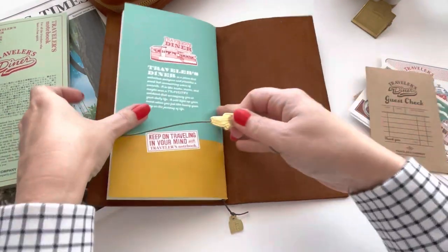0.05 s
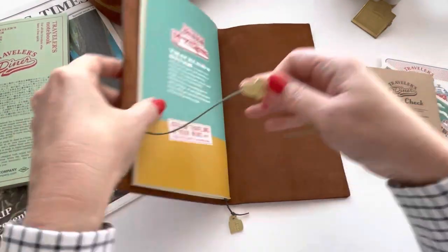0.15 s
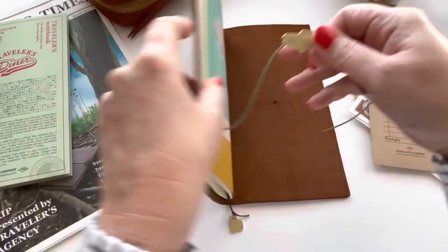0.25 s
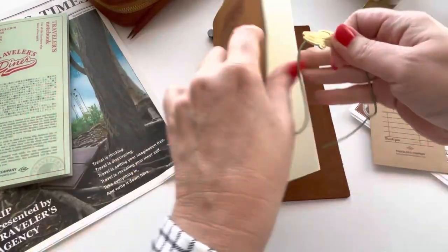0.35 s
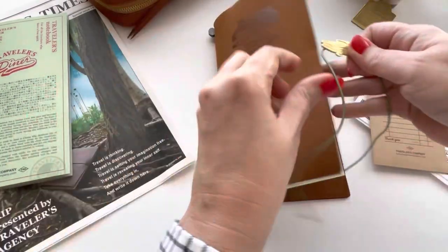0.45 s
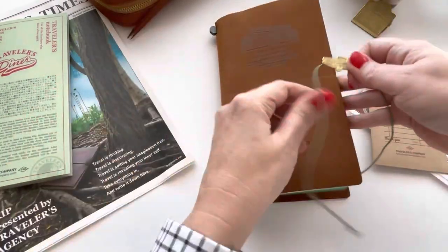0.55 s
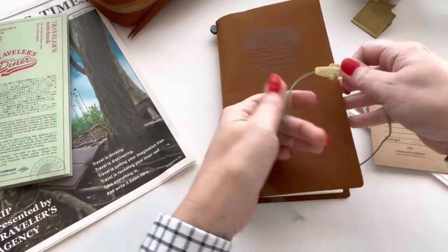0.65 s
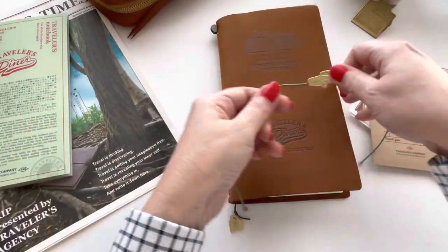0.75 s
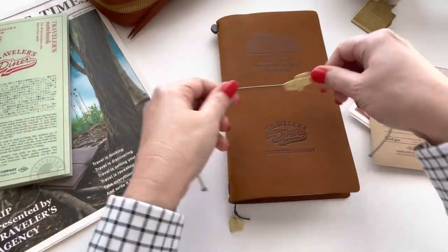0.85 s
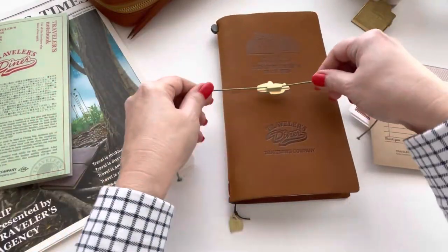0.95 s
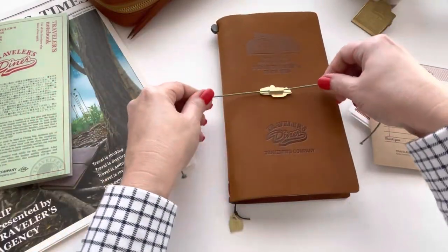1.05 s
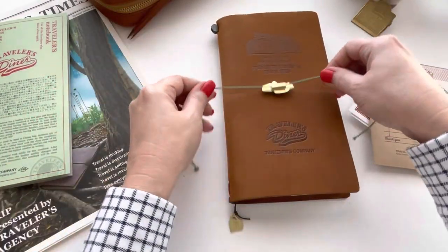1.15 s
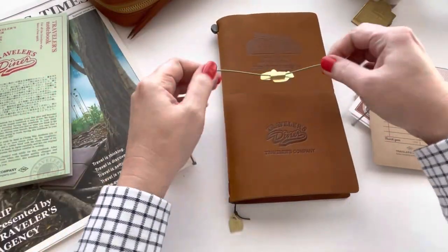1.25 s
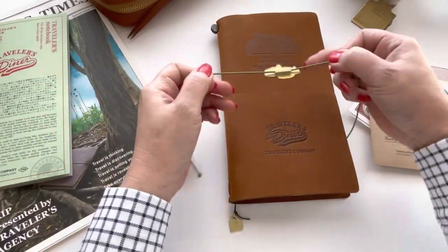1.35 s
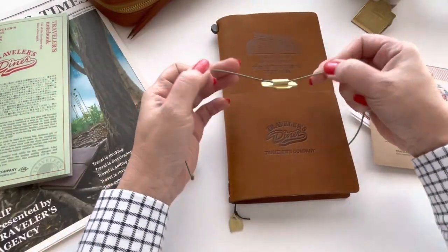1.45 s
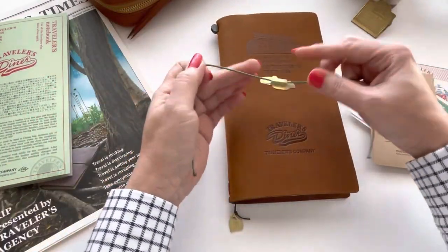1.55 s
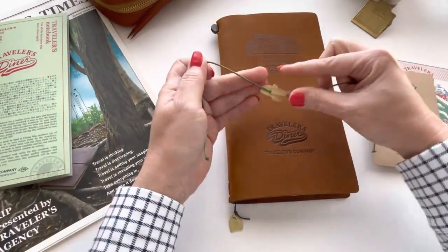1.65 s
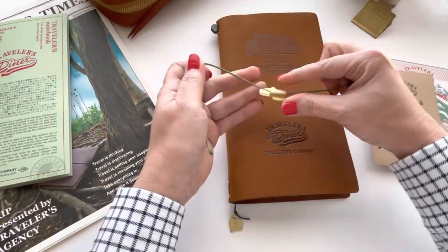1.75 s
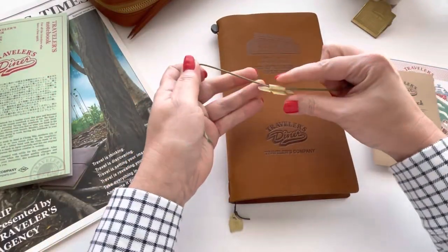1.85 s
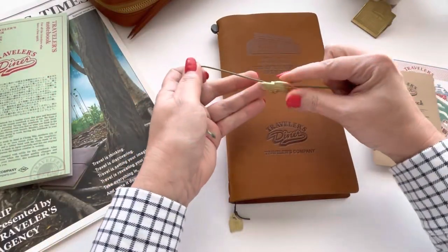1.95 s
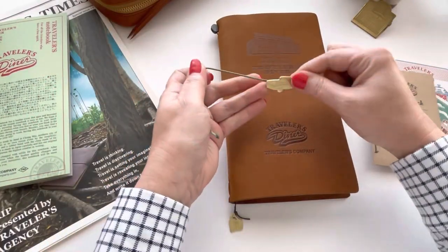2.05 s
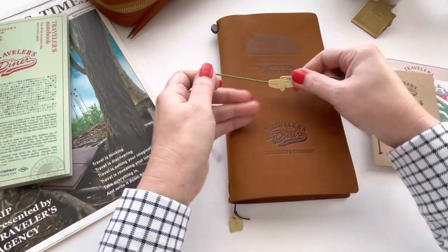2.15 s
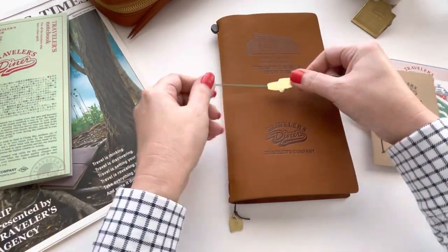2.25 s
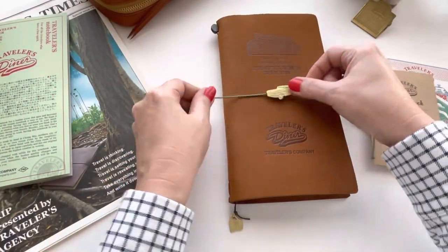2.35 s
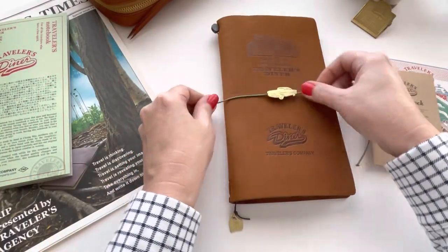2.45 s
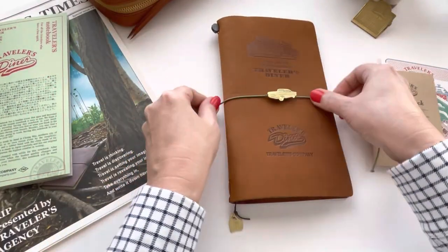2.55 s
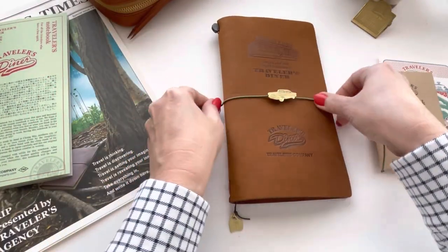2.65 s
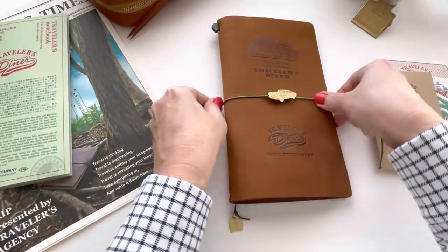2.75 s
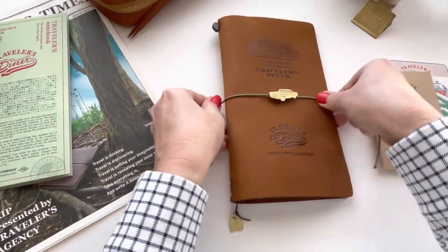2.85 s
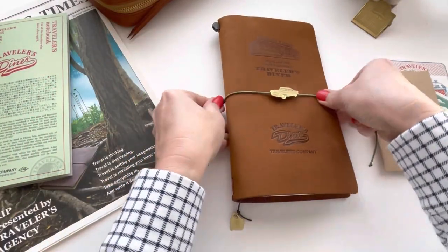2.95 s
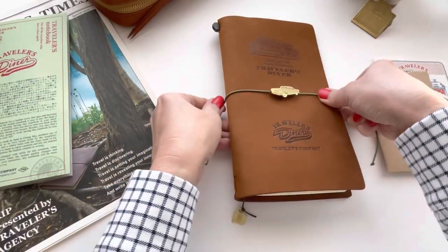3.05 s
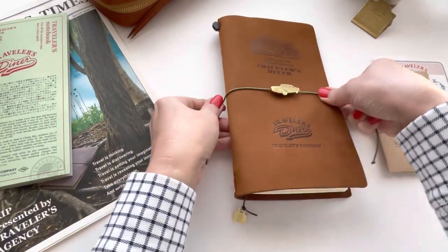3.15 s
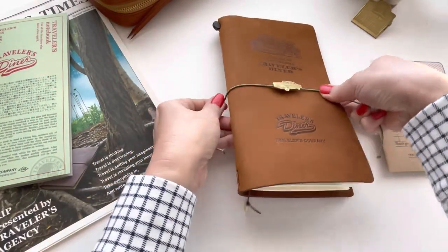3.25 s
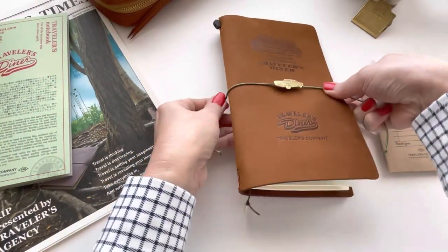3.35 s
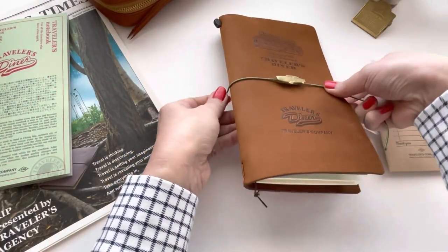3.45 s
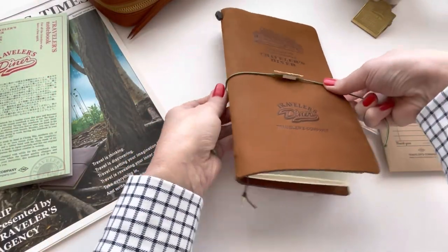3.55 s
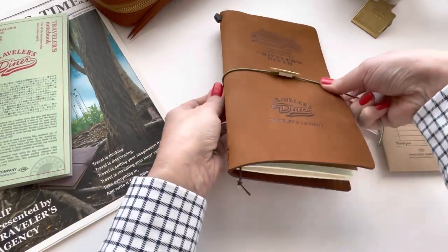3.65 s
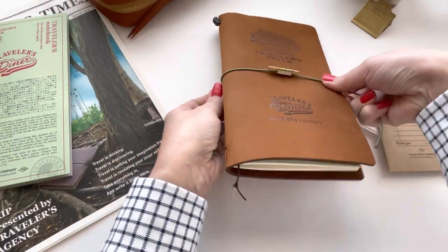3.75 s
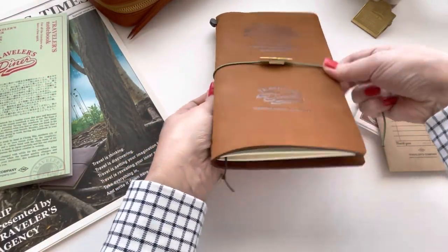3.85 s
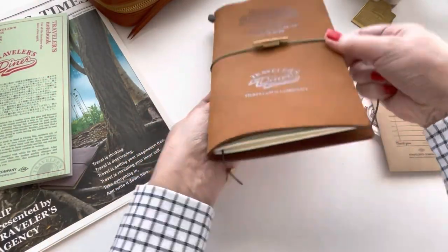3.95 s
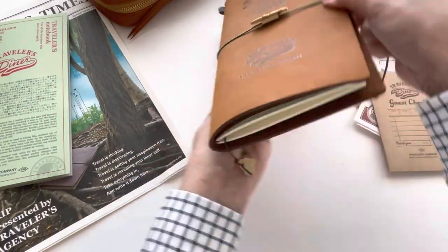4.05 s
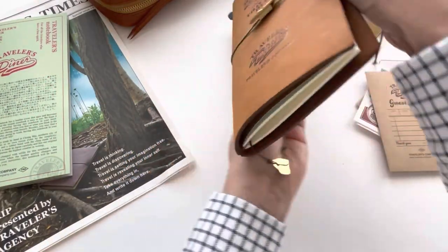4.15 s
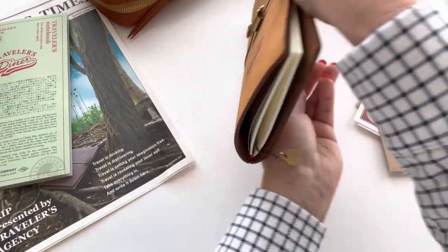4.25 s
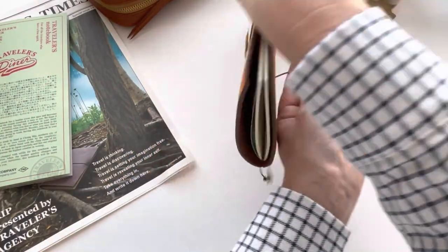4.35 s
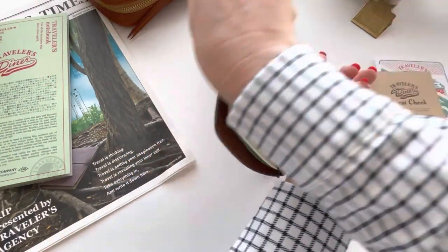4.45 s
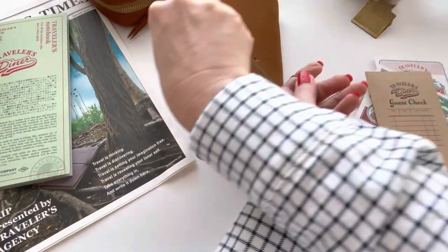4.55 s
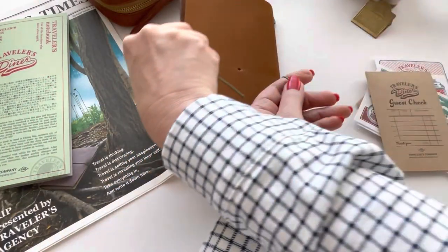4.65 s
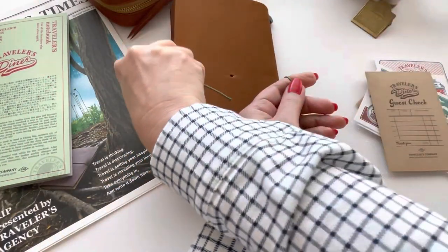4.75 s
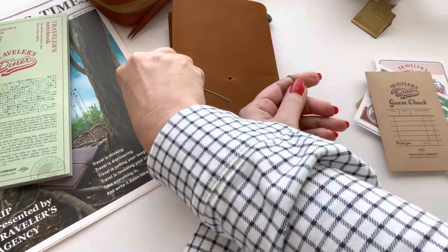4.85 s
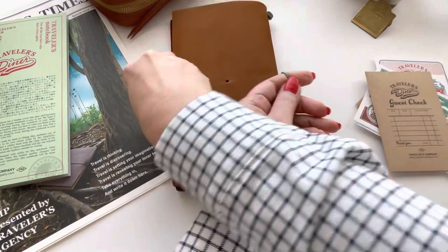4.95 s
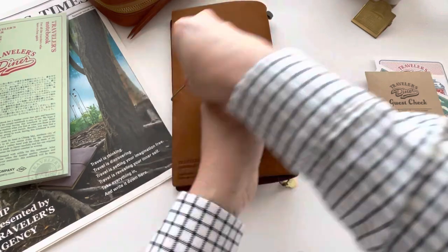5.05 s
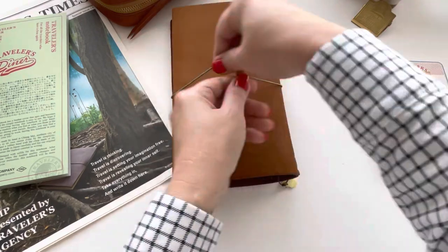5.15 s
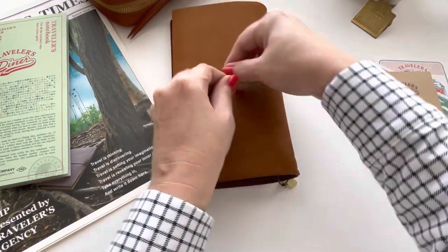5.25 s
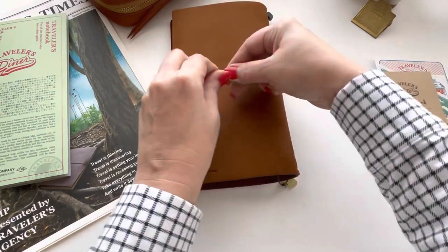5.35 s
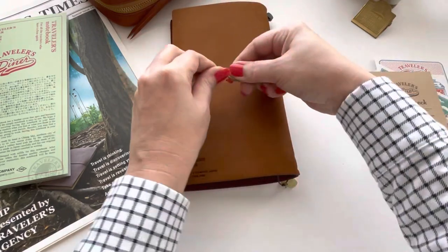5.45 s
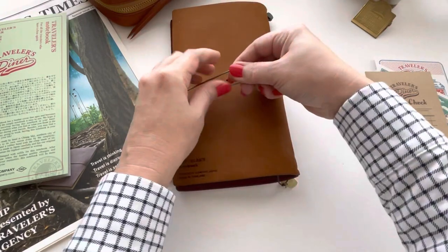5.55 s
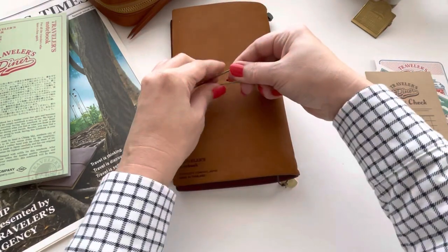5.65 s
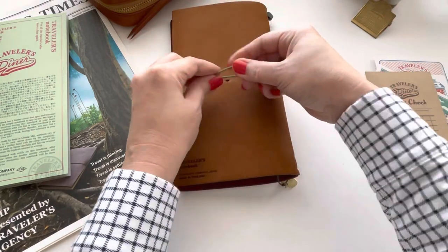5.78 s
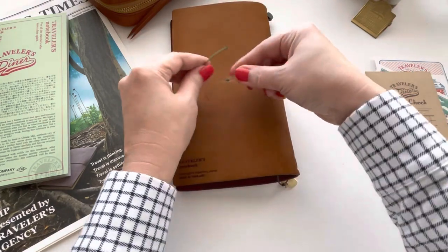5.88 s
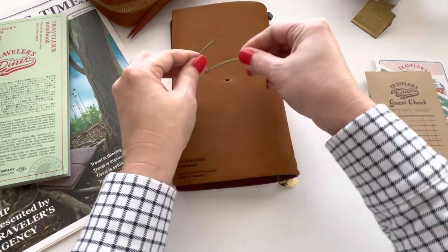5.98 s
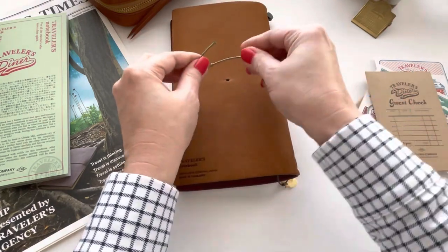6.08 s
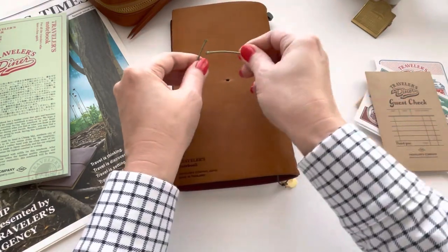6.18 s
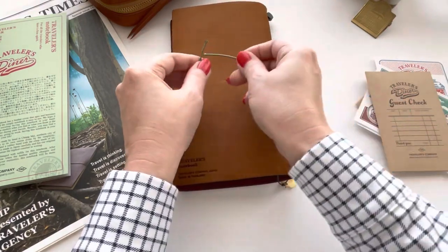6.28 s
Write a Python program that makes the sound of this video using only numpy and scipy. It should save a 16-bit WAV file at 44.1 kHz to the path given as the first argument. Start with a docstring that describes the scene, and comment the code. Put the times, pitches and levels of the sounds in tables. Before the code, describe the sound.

Hands work at a table with a leather-covered notebook and small metal charm. Opening skin hiss and cover flap end in knocks and a dull thud; two quick taps follow, then only tiny cord rustles. Gentle clicks and dry scrapes build to the loudest moment, a rapid burst of woody knocks and leather rub as the book lands. It fades to faint fidgeting in a small, quiet room, heard close in stereo, slightly stronger on the right.

```python
"""At a hollow table in a quiet room, hands close, lift, turn over and set down a leather notebook.
Nails, a metal charm and the cover tap: falling chirps with rattling, snapping and ticking noise bursts.
Soft pushes boom as decaying modes of the table top; skin, cord and cloth rub as shaped noise in short strokes.
A stereo microphone hears these near sources partly alike; the room answers with a decaying tail and hums."""
import sys
import numpy as np
from scipy import signal
from scipy.fft import rfft, irfft, next_fast_len
from scipy.io import wavfile
from scipy.ndimage import uniform_filter1d, map_coordinates

SR = 44100
rng = np.random.default_rng(int(sys.argv[2]) if len(sys.argv) > 2 else 0)


def field_ratio(decibels):
    """Amplitude ratio for a level in dB (20 dB per decade); scalars and array-likes work."""
    return 10 ** (np.asarray(decibels, dtype=float) / 20)


def wav_record(signal):
    """Record a signal, one row per channel, as 16-bit PCM in the file named by sys.argv[1]."""
    frames = np.transpose(np.atleast_2d(signal))
    bounded = np.clip(frames, -1, 1)
    # unit amplitude maps onto the largest positive 16-bit level
    quanta = np.round(bounded * 32767).astype(np.int16)
    wavfile.write(sys.argv[1], SR, quanta)


N = 278712  # length in samples

# Sharp contacts. Each row: start in seconds, level in dB, reference pitch of the chirp in Hz,
# snap in relative dB, tick in relative dB.
TAPS = [(0.351, -38.5, 970, 2, -4), (0.36, -20, 1970, -18, -8), (0.365, -22, 903, -6, -16),
        (0.384, -46, 665, -1, -19), (0.467, -44, 704, 0, -19), (0.516, -46, 910, -9, -25),
        (0.568, -31.5, 1900, -5, -22), (0.586, -25, 2320, -22, -16), (0.621, -22.5, 1322, -9.5, -20),
        (0.913, -22, 1030, -10.5, -52), (0.924, -24, 1230, -15.5, -19.5), (1.019, -26, 1430, -22, -39),
        (1.026, -34, 700, -29, -43), (1.092, -59.5, 1090, -20, 5.5), (1.3, -49.5, 1880, -11, -30),
        (2.263, -61, 1000, 1, 13), (2.33, -35.5, 1110, -35, -30), (2.479, -51, 614, -13, -17),
        (2.609, -38.5, 1286, -6, -21), (2.658, -44, 1650, -22, -29), (2.909, -33, 1330, -30, -31),
        (2.919, -27, 1756, -10, -23), (2.927, -31, 870, -36, -41), (2.976, -29, 980, -36, -24),
        (3.039, -36, 870, -38, -30), (3.268, -49.5, 890, -5, -13), (3.311, -43.5, 1520, -32, -31),
        (3.396, -45, 1040, -32, 6), (3.527, -34, 1235, -19.5, -38), (3.575, -38.5, 640, -25, -35),
        (3.607, -30.5, 640, -35, -31), (3.75, -44.5, 1990, -18, -30), (3.794, -43, 2280, -27, -21),
        (3.808, -46, 1480, -16, -26), (4.411, -12.5, 1365, -39.5, -30), (4.415, -13, 1230, -42, -23.5),
        (4.421, -14, 825, -33, -55), (4.444, -25.5, 850, -26.5, -23.5), (4.46, -12, 1215, -33.5, -24.5),
        (4.466, -11, 767, -38.5, -42), (4.482, -18.5, 606, -26, -31), (4.487, -9, 796, -6.5, -39.5),
        (4.495, -11, 790, -24.5, -36.5), (4.504, -20.5, 1100, -23, -38.5), (4.512, -25, 760, -22.5, -39.5),
        (4.545, -20.5, 1480, -14, -46.5), (4.552, -38.5, 883, -11, -37), (4.627, -22.5, 1412, -31, -42.5),
        (4.781, -45.5, 1260, -30, -38), (4.914, -31.5, 764, -1.5, -2.5), (4.927, -26.5, 1560, -9.5, -10),
        (4.941, -21.5, 820, -28.5, -33), (4.989, -39.5, 910, -8, -33), (5.266, -44, 736, -28, -29),
        (5.299, -55, 1800, -13, -8), (5.884, -49.5, 2160, -16, -30), (6.148, -51, 786, -20, -27)]
TAP_T60_S = 0.016  # decay of every chirp
# Hard edge of a contact. Each row: frequency in Hz, spectral level in dB.
SNAP_SPECTRUM = [(1500, 14), (2800, 6.5), (4500, 2), (6500, -12), (9000, -22)]
# Cover and page block resonances. Each row: frequency in Hz, width in Hz, level in dB.
BOOK_MODES = [(870, 24, 1.5), (1330, 37, -5), (1702, 12, -11.5), (2020, 25, -8), (2320, 78, -0.5),
              (2780, 20, -29), (3160, 420, 0)]
# Soft heavy contacts on the table. Each row: start in seconds, level in relative dB,
# contact time constant in seconds, brightness in dB per octave, extra level of the deepest mode in dB.
THUDS = [(0.361, -36.5, 0.0015, 0.5, 6.5), (0.398, -46.5, 0.0024, 2, -4), (0.466, -40.5, 0.012, 0.1, 4),
         (0.6, -16, 0.0056, -2.7, -2.5), (0.623, -36, 0.003, -4, 4), (0.916, -33.5, 0.0056, -4, -5),
         (1.02, -38, 0.0087, 0, -6), (2.333, -42, 0.0054, 1, -2), (2.611, -34.5, 0.0026, -7.5, -8.5),
         (2.719, -39, 0.0042, -5, -14), (2.828, -42, 0.0029, -4, 2), (2.923, -39, 0.003, 6.5, 1),
         (2.979, -27.5, 0.0017, -3.5, -11), (3.397, -43, 0.0028, 4, 6), (3.576, -25.5, 0.0023, 8, 5),
         (3.609, -38, 0.0023, 3, -8), (3.787, -56, 0.0046, 9.5, -9), (4.414, -31.5, 0.0035, 20.5, 9),
         (4.46, -26, 0.0031, 17.5, 1), (4.489, -29.5, 0.0027, -2, -4), (4.542, -23.5, 0.0053, 8.5, 6),
         (4.68, -38.5, 0.0023, -1.5, 0), (4.944, -24.5, 0.0032, -4, -4)]
# Table top modes. Each row: frequency in Hz, level in dB, T60 in seconds.
TABLE_MODES = [(90.3, -9.5, 0.29), (188.3, 1, 0.11), (240.5, -6.5, 0.14), (342.3, -4.5, 0.086),
               (411, -6.5, .1), (512, -10.5, 0.061), (674, -13.5, 0.034)]
# Skin and cloth sliding over a smooth surface. Each row: peak time in seconds, rise in seconds,
# fall in seconds, hiss level in dB, finest hiss level in dB.
SLIDES = [(0.0, .01, 0.13, -48, -56), (0.105, .3, 0.094, -61.5, -60), (0.323, 0.026, 0.022, -47, -51),
          (0.378, 0.0085, 0.056, -55, -63), (0.478, 0.031, .04, -62.5, -70), (0.57, 0.014, 0.049, -45, -54),
          (0.79, 0.038, .037, -67, -75.5), (0.908, 0.012, .02, -63, -61), (1.172, .018, .04, -56.5, -61),
          (1.504, .04, 0.028, -71.5, -64), (1.636, .025, .025, -85, -72), (2.579, .007, 0.069, -56, -58),
          (2.789, 0.038, 0.041, -62, -71), (2.919, .015, .018, -80, -71), (3.035, 0.088, 0.058, -68, -59.5),
          (3.23, 0.067, 0.02, -67, -53), (3.392, .011, 0.019, -50, -65), (3.804, .1, 0.1, -71, -84),
          (3.992, 0.13, 0.17, -68, -79), (4.148, 0.099, 0.082, -65, -69), (4.215, .05, 0.17, -64.5, -73.5),
          (4.385, 0.068, 0.056, -51.5, -53.5), (4.44, .03, .03, -80, -80),
          (4.459, 0.0026, 0.016, -60, -32.5), (4.497, 0.035, 0.062, -58, -71),
          (4.926, 0.016, 0.025, -45.5, -57), (5.122, 0.13, 0.063, -62, -58), (5.296, .05, 0.039, -76, -79),
          (5.761, 0.031, .022, -74, -61)]
# Skin on a smooth surface. Each row: frequency in Hz, spectral level in dB.
HISS_SPECTRUM = [(2200, -12), (3500, -3), (5000, -1.5), (8000, -2.5), (11000, -4.5), (12600, -11.5),
                 (14000, -40)]
# Dry cloth and fingertip ridges. Each row: frequency in Hz, spectral level in dB.
FINE_SPECTRUM = [(11500, -22), (13200, -11.5), (15000, 7.5), (15800, -12.5), (16600, -28.5)]
# Scrapes of leather and paper. Each row: peak time in seconds, rise in seconds, fall in seconds,
# level in dB, pitch in Hz of the cavity under the hand.
SCRAPES = [(0.0, .01, 0.054, -38.5, 3330), (0.005, 0.023, .05, -46, 1460), (0.1, 0.18, 0.2, -64.5, 3100),
           (0.22, 0.14, .15, -68.5, 1400), (0.323, 0.024, 0.053, -52.5, 2900),
           (0.392, 0.04, 0.042, -48, 2146), (0.473, 0.014, 0.077, -54.5, 1600),
           (0.568, 0.023, .04, -43, 2030), (0.588, .03, 0.039, -44, 2200),
           (0.612, 0.091, 0.07, -48.5, 1520), (0.69, .15, 0.069, -70, 1450),
           (0.934, 0.011, 0.041, -48, 2100), (2.614, .035, 0.089, -54, 1330),
           (2.79, 0.06, 0.073, -52, 2100), (2.919, 0.019, 0.026, -40.5, 1330), (3.024, 0.13, 0.1, -53, 887),
           (3.165, 0.018, 0.052, -60, 1190), (3.229, 0.042, 0.028, -47, 920), (3.27, 0.011, .01, -50, 1070),
           (3.403, 0.0085, 0.016, -55, 1280), (3.536, 0.0046, 0.044, -58, 1000),
           (3.56, .03, 0.046, -59, 1690), (3.613, 0.048, 0.054, -60.5, 1320),
           (3.74, 0.011, 0.13, -63, 1320), (3.804, 0.036, 0.014, -53.5, 1670),
           (3.88, 0.053, 0.032, -68.5, 1800), (3.992, 0.04, 0.06, -66, 2030),
           (4.148, 0.09, 0.092, -71.5, 2020), (4.215, 0.086, 0.27, -66, 2530),
           (4.341, .018, 0.16, -50.5, 2390), (4.365, 0.038, 0.079, -58, 1420),
           (4.388, 0.054, 0.018, -43, 2280), (4.445, 0.032, 0.02, -45, 1130),
           (4.514, 0.055, 0.04, -31.5, 978), (4.545, .04, 0.06, -39.5, 1240), (4.605, .1, 0.12, -53, 1220),
           (4.646, 0.016, 0.095, -49.5, 1300), (4.677, 0.029, 0.022, -47.5, 820),
           (4.72, 0.023, .025, -51.5, 796), (4.783, 0.063, 0.07, -57.5, 1450),
           (4.88, 0.021, 0.064, -58.5, 1350), (4.916, 0.011, 0.06, -41.5, 1180),
           (4.94, 0.034, 0.019, -47.5, 1110), (5.07, 0.17, 0.27, -62.5, 1230),
           (5.128, 0.082, 0.061, -57, 1420), (5.296, 0.083, 0.058, -61, 1135),
           (5.812, 0.013, 0.045, -63.5, 1400)]
# Scrape sound outside the cavity resonance. Each row: frequency in Hz, spectral level in dB.
SCRAPE_SPECTRUM = [(290, -6), (500, 2.5), (690, -11), (914, -5), (1220, -23), (1340, -3.5), (2310, -6.5),
                   (4300, -22.5), (6000, -34), (7800, -60.5), (13200, -120)]
SLIDE_ROUND, SCRAPE_ROUND = 1.26, 1.24  # exponents of the swells: 1 is a pointed peak, more is rounder
FINE_SHORTER = 0.67  # the finest hiss rises and falls in this share of the slide's times
# A firm scrape rings narrow; loose paper and lighter scrapes add width (shares of the pitch).
FIRM_DB, FIRM_WIDTH, PAPER_WIDTH, LIGHT_WIDTH = -42, 0.3, 0.92, 0.31
# Faint fidgeting of fingers and cord between strokes. Each row: time in seconds, nominal level in dB.
FIDGET = [(0, -71), (0.75, -72.5), (0.85, -95), (1.25, -86), (1.42, -72), (1.7, -76.5), (1.8, -105),
          (2.52, -80), (2.7, -63), (3.2, -76), (3.33, -81), (3.6, -70), (4.75, -77.5), (5.42, -69.5),
          (5.5, -95.5), (5.78, -92), (5.92, -73), (6.32, -70)]
FIDGET_HZ, FIDGET_SWING_DB = 1850, 3.5  # cavity pitch; unevenness of the nominal level
FIDGET_HISS_DB, FIDGET_FINE_DB = -19 + 7, -19  # both hisses, relative to the fidgeting scrape
# Microphone bass roll-off for taps and thuds. Each row: frequency in Hz, gain in dB.
MIC = [(20, -42), (45, -14), (80, -6), (150, -1.1), (16000, -3)]
# Stereo balance of near sources. Each row: frequency in Hz, left minus right in dB.
TILT = [(60, -0.5), (180, -4), (550, -3), (1650, -5.5), (4970, -6.5), (15000, -3.5)]
# Likeness of near sources at left and right. Each row: frequency in Hz, correlation (no unit).
NEAR_LIKENESS = [(100, 1), (500, 0.93), (1500, 0.45), (4000, 0.3), (9000, 0.26), (14000, 0.7)]
# Phase lag of the left port in the part heard alike. Each row: frequency in Hz, lag in radians.
LAG = [(100, .01), (900, 0.54), (2300, 1.48), (5000, 1.04), (10000, 1.1), (14000, .3)]
# Decay of the room's answer. Each row: frequency in Hz, T60 in seconds.
ROOM_DECAY = [(150, 0.26), (1000, 0.18), (4000, .22), (12000, 0.2)]
# Room tone. Each row: frequency in Hz, relative spectral level in dB.
HUM_SPECTRUM = [(15, -66.5), (25, -39.5), (43, -20), (66, -11.5), (120, -2), (200, -6.5), (242, -6.5),
                (405, -11), (476, -12), (607, -15.5), (962, -21.5), (1230, -23.5), (1370, -25.5),
                (10700, -36), (16000, -37)]
HUM_DB = -62.5  # level about which the hum breathes
# Likeness of the hum at left and right. Each row: frequency in Hz, correlation (no unit).
HUM_LIKENESS = [(60, 0.88), (240, 0.66), (950, -0.069), (3770, -0.24), (15000, 0.2)]


def taps():
    """Dispersion: treble outruns bass in a stiff sheet, so a contact arrives as a falling chirp with noise."""
    out, t = np.zeros(N + SR), np.arange(SR // 6) / SR
    rise = 1 - np.exp(-(t / 0.00089) ** 2)
    fade = field_ratio(-60 * t / TAP_T60_S)
    fall_s = 0.00255  # time constant of the chirp's fall
    # integral of a frequency falling from 1.77 to 0.546 times the reference pitch
    cycles = 0.546 * t + 1.224 * fall_s * (1 - np.exp(-t / fall_s))
    for s, db, hz, snap_db, tick_db in TAPS:
        noise = rng.standard_normal((3, len(t)))
        chirp = np.sin(2 * np.pi * hz * cycles)
        rattle = unit(filtered(noise[0], lambda f: book(f) * peak(f, hz, width=2.4) / (1 + (f / 2250) ** 6)))
        snap = unit(filtered(noise[1], lambda f: field_ratio(along(SNAP_SPECTRUM, f))))
        snap = snap * field_ratio(-60 * t / 0.016)
        tick = unit(filtered(noise[2], lambda f: field_ratio(along(HISS_SPECTRUM, f)) + 0.6 * field_ratio(along(FINE_SPECTRUM, f))))
        tick = tick * field_ratio(-60 * t / 0.0095)
        body = chirp * fade + 0.3 * rattle * fade ** 0.45
        settle = 0.06 * rattle * field_ratio(-60 * t / 0.07)  # the pages settle after the knock
        sound = body + settle + field_ratio(snap_db + 7.5) * snap + field_ratio(tick_db + 7.0) * tick
        out[round(s * SR):][:len(t)] += field_ratio(db) * rise * sound
    return out[:N]


def thuds():
    """Modal excitation: a soft push rings the table's modes, the deepest depending on where it lands."""
    out, t = np.zeros(N + SR), np.arange(SR // 3) / SR
    hz, level_db, t60 = np.transpose(TABLE_MODES)[:, :, None]
    modes = field_ratio(-60 * t / t60) * np.sin(2 * np.pi * hz * t)
    for s, db, contact, bright_db, deep_db in THUDS:
        mode_db = level_db + bright_db * np.log2(hz / 200) + deep_db * (hz == hz[0])
        mode_db = mode_db + 2.4 * rng.standard_normal(hz.shape)
        ring = np.sum(field_ratio(mode_db) * modes, axis=0)
        onset = 1 - np.exp(-t / max(contact, 0.0003))
        out[round(s * SR):][:len(t)] += field_ratio(db - 4.5) * ring * onset
    return out[:N]


def strokes():
    """Sliding friction: skin hisses and leather scrapes, with one fidgeting power beneath both."""
    coarse = np.arange(N)[::32] / SR  # envelopes are computed every 32 samples
    fidget_db = np.interp(coarse, *np.transpose(FIDGET)) + FIDGET_SWING_DB * wobble(30)[::32]
    fidget = field_ratio(2.015 * fidget_db)
    return slides(coarse, fidget) + scrapes(coarse, fidget)


def slides(coarse, fidget):
    """Friction on a smooth surface: dense slips give a hiss, and finer ridges a shorter, finer one."""
    s, rise, fall, hiss_db, fine_db = np.transpose(SLIDES)[:, :, None]
    hiss = unit(filtered(slips(grain_db=-1.0, clump_db=0.5), lambda hz: field_ratio(along(HISS_SPECTRUM, hz))))
    fine = unit(filtered(slips(grain_db=0.5, clump_db=3.5), lambda hz: field_ratio(along(FINE_SPECTRUM, hz))))
    hiss_power = swells(coarse, s, rise, fall, hiss_db, SLIDE_ROUND)
    fine_power = swells(coarse, s, FINE_SHORTER * rise, FINE_SHORTER * fall, fine_db, SLIDE_ROUND)
    hiss = level(coarse, hiss_power, fidget, FIDGET_HISS_DB) * hiss
    return hiss + level(coarse, fine_power, fidget, FIDGET_FINE_DB) * fine


def scrapes(coarse, fidget):
    """Cavity resonance: friction noise is coloured by the book and by the hollow under the hand."""
    s, rise, fall, scrape_db, pitch = np.transpose(SCRAPES)[:, :, None]
    power = swells(coarse, s, rise, fall, scrape_db, SCRAPE_ROUND)
    hz, t, z = signal.stft(slips(grain_db=3.0, clump_db=1.5), SR, nperseg=256)
    frame = np.minimum((t * SR / 32).astype(int), len(coarse) - 1)
    centre = np.append(pitch, FIDGET_HZ)
    paper = np.clip((centre - 2450) / 500, 0, 1)  # the highest scrapes are loose paper, broad in colour
    light = np.clip((FIRM_DB - np.append(scrape_db, FIRM_DB - 20)) / 20, 0, 1)  # fidgeting is lightest
    spread = FIRM_WIDTH + PAPER_WIDTH * paper + LIGHT_WIDTH * light
    cavity = np.abs(peak(hz[:, None], centre, spread)) ** 2
    colour = cavity * book(hz)[:, None] + 0.41 * field_ratio(along(SCRAPE_SPECTRUM, hz))[:, None]
    colour_power = (colour / np.linalg.norm(colour, axis=0)) ** 2
    # overlapping strokes mix by power
    mixed = np.sqrt(colour_power @ np.vstack([power, fidget])[:, frame])
    mixed = mixed / np.linalg.norm(mixed, axis=0)
    scrape = unit(signal.istft(z * mixed, SR, nperseg=256)[1][:N])
    return level(coarse, power, fidget, 0) * scrape


def level(coarse, power, fidget, fidget_db):
    """Incoherent sources add in power: the amplitude of all strokes and fidgeting at each sample."""
    total = power.sum(axis=0) + fidget * field_ratio(2 * fidget_db)
    return np.interp(np.arange(N) / SR, coarse, np.sqrt(total))


def swells(time, s, rise, fall, db, roundness):
    """Power envelope of each stroke: rise and fall are the times to climb and drop 20 dB."""
    gap = time - s
    drop_db = 20 * np.where(gap < 0, -gap / rise, gap / fall) ** roundness
    return field_ratio(2 * (db - drop_db))


def slips(grain_db, clump_db):
    """Stick and slip: dense tiny slips of uneven size, coming in clumps."""
    size_db = grain_db * rng.standard_normal(N) + clump_db * wobble(130)
    return unit(patchy(rng.standard_normal(N) * field_ratio(size_db), patchy_db=3.0))


def patchy(x, patchy_db):
    """Varying surface: the rubbed spot keeps changing, so bands of colour come and go."""
    z = signal.stft(x, nperseg=256)[2]
    field = uniform_filter1d(rng.standard_normal(z.shape), size=5, axis=0)  # across frequency
    field = uniform_filter1d(field, size=9, axis=1)  # across time
    return signal.istft(z * field_ratio(patchy_db * unit(field)), nperseg=256)[1][:N]


def book(f):
    """Modal superposition: the notebook's resonances, alternating in sign, over a flat share."""
    total = 0
    for k, (hz, width, db) in enumerate(BOOK_MODES):
        total = total + (-1) ** k * field_ratio(db) * peak(f, hz, width / hz)
    return 0.5 + np.abs(total)


def peak(f, hz, width):
    """Damped resonance: the response of one mode at hz, its width a share of hz."""
    damping = 1j * f * hz * width
    return damping / (hz * hz - f * f + damping)


def ports(x):
    """Partial coherence: moving hands smear the unlike part anew every moment, and the left port lags."""
    other, step = np.zeros((2, N + SR)), SR // 24
    for start in range(0, N, step):
        smear = rng.standard_normal((1, 200)) * field_ratio(-60 * np.arange(200) / SR / 0.005)
        piece = signal.fftconvolve(x[:, start:start + step], smear / np.linalg.norm(smear), axes=1)
        other[:, start:start + piece.shape[1]] += piece
    turn = lambda hz: likeness_angle(NEAR_LIKENESS, hz)
    lag = lambda hz: np.exp(0.5j * along(LAG, hz) * np.array([[-1], [1]]))
    alike = filtered(x, lambda hz: np.cos(turn(hz)) * lag(hz))
    return alike + filtered(other[:, :N], lambda hz: np.sin(turn(hz)) * np.array([[1], [-1]]))


def room(x):
    """Reverberation: each frequency of the room's answer dies at its own speed."""
    hz, t, z = signal.stft(rng.standard_normal((2, SR // 2)), SR, nperseg=256)
    decay = field_ratio(-60 * t / along(ROOM_DECAY, hz)[:, None])
    tail = signal.istft(z * decay, SR, nperseg=256)[1]
    delayed = np.pad(x, ((0, 0), (250, 0)))  # samples
    return signal.fftconvolve(delayed, tail / np.linalg.norm(tail[0]), axes=1)[:, :N]


def hum():
    """Diffuse field: room tone near mono in the bass, unrelated in the treble, slowly breathing."""
    def mid_side(hz):
        turn = likeness_angle(HUM_LIKENESS, hz)
        return field_ratio(along(HUM_SPECTRUM, hz)) * [np.cos(turn), np.sin(turn)]

    mid, side = filtered(rng.standard_normal((2, N)), mid_side)
    stereo = unit(np.array([mid + side, mid - side]))
    return field_ratio(HUM_DB + 0.24 * wobble(1.06)) * stereo * sides(pan_db=-2.5)


def likeness_angle(likeness, hz):
    """Correlation as rotation: the angle sharing power between the alike and unlike parts."""
    return np.arccos(np.clip(along(likeness, hz), -1, 1)) / 2


def sides(pan_db):
    """Level difference: left and right gains for a left-right step."""
    return field_ratio(np.array([[0.5], [-0.5]]) * pan_db)


def wobble(rate):
    """Slow modulation: a smooth random curve with rate knots a second."""
    knots = rng.standard_normal(int(N * rate / SR) + 4)
    return map_coordinates(knots, [np.arange(N) * rate / SR])


def filtered(x, response):
    """Linear filtering: the spectrum of x times a complex response of frequency."""
    m = next_fast_len(x.shape[-1] + 8192)
    return irfft(rfft(x, m) * response(np.fft.rfftfreq(m, 1 / SR)), m)[..., :x.shape[-1]]


def along(points, hz):
    """Logarithmic frequency: (Hz, value) points interpolated on a log axis."""
    f, v = np.transpose(points)
    return np.interp(np.log(hz + 1), np.log(f + 1), v)


def unit(x):
    """Normalization: x scaled to rms 1."""
    return x / np.sqrt(np.mean(x ** 2) + 1e-20)


def scene():
    """Superposition: hands and notebook near the microphone, the room's answer and its hum."""
    contacts = filtered(taps() + thuds(), lambda hz: field_ratio(along(MIC, hz)))
    near = filtered(contacts + strokes(), lambda hz: sides(along(TILT, hz)))
    return ports(near) + field_ratio(-12.5) * room(near) + hum()


def roll_off(x):
    """The treble ends steeply here."""
    return signal.sosfilt(signal.butter(12, 16690, fs=SR, output="sos"), x)


def record(dry):
    """Recording: the finished stereo mix is stored."""
    return roll_off(dry)


dry = scene()
out = record(dry)
wav_record(out)
```